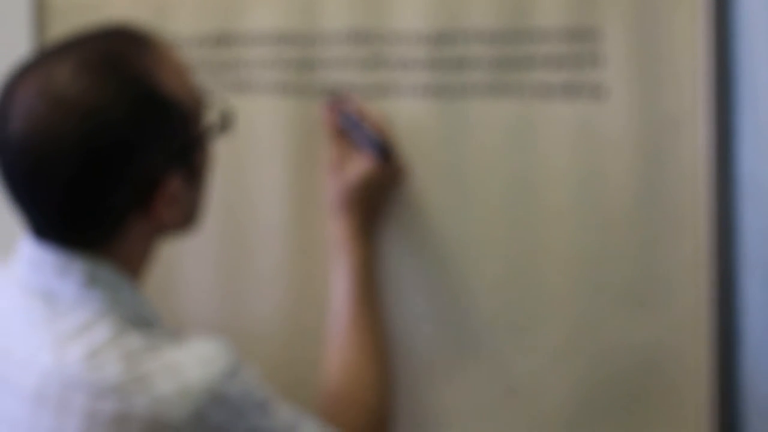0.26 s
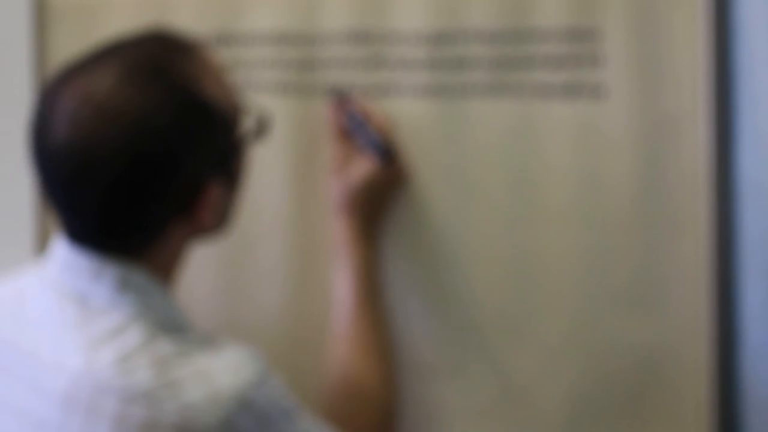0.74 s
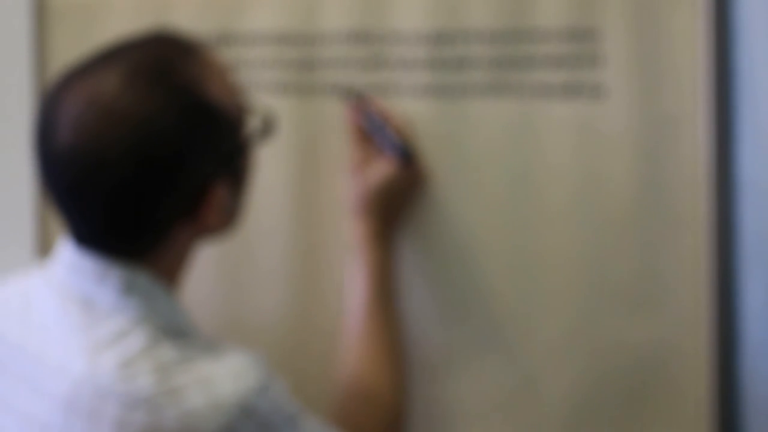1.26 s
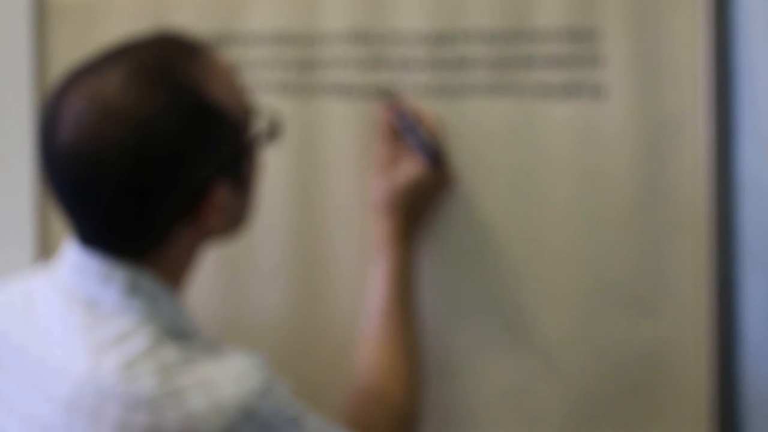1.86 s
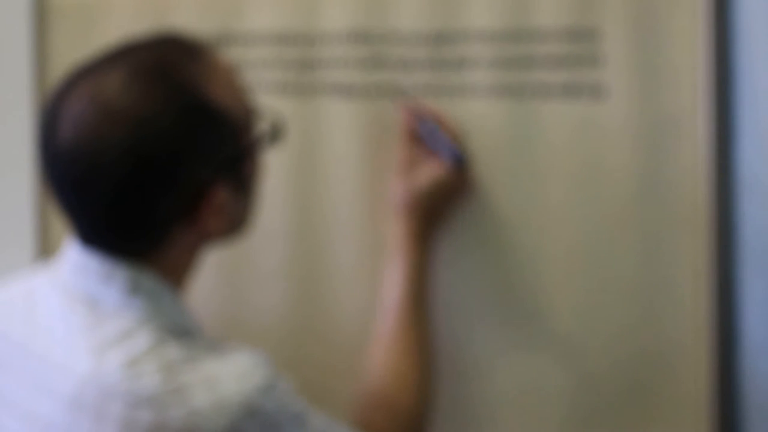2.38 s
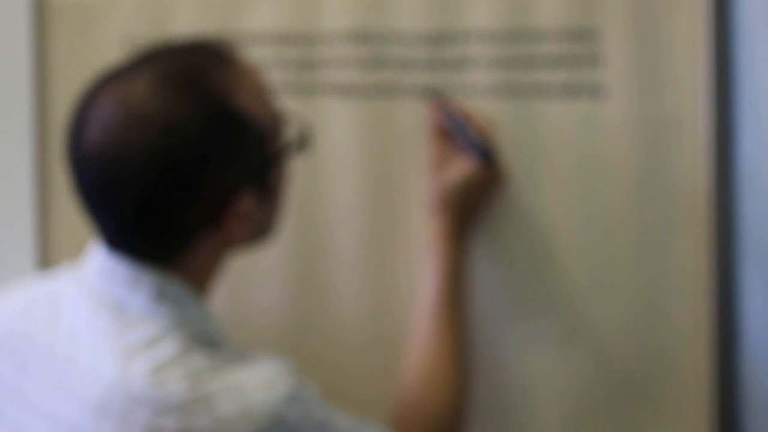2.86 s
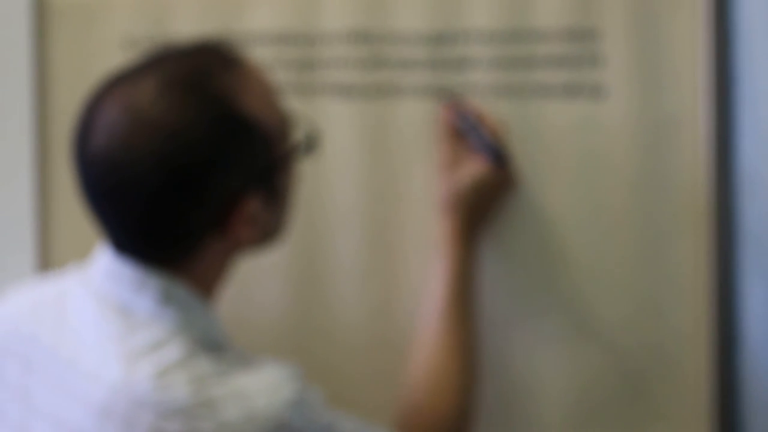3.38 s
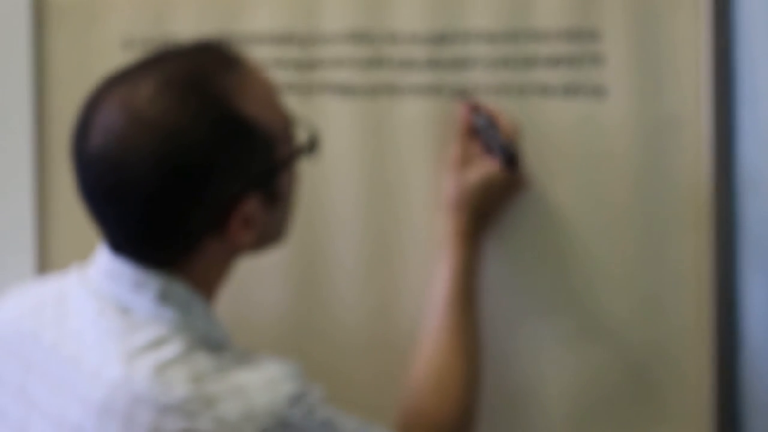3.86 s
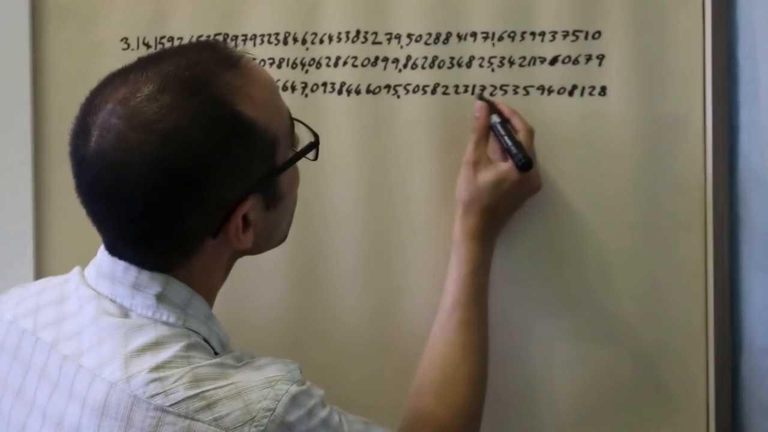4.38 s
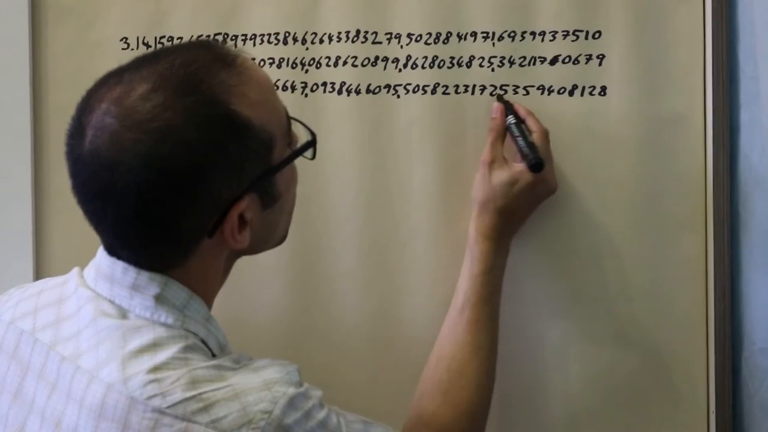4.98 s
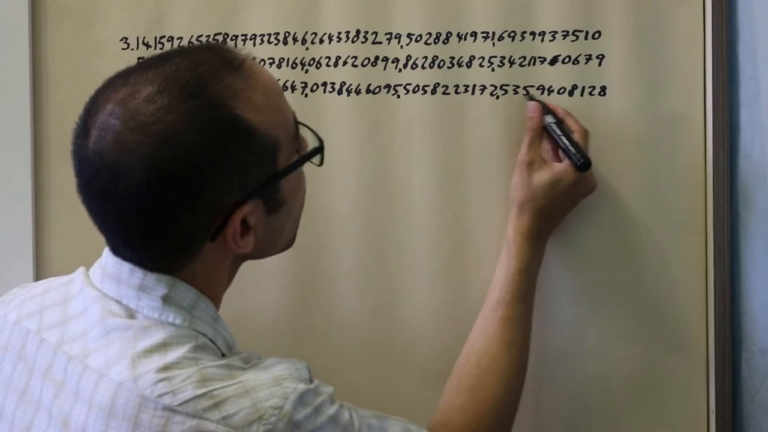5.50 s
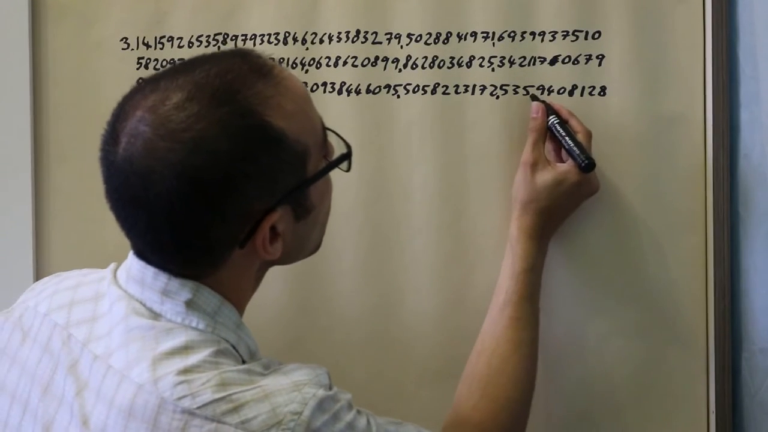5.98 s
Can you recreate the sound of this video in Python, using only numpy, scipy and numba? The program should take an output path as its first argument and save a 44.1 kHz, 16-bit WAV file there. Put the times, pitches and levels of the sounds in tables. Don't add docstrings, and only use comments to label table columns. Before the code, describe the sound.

A quiet indoor room with short, dull reverberation, faint low mains hum and soft steady noise, heard from close to the board. A hand rubs the thin board with a low rumble at the start as a felt-tip marker begins to write. From 0 to 2.4 s, light ticks with hollow low knocks come every quarter to half second, between short, airy, grainy felt hisses. At 2.5 s a much harder tap booms, followed at once by several tiny bounces and a scratch. From 2.8 to 4.4 s the writing is lighter and irregular, with moderate thumps around 3.0 and 3.3 s. A sparse pause follows, with one soft stroke near 4.65 s. At 5.0 s a tap leads to a sharp, loud one at 5.2 s and overlapping hisses; faint brushing follows until a last bright stroke and hard tap at 6.2 s.

```python
import sys
import numpy as np
from scipy import signal
from scipy.fft import rfft, irfft, next_fast_len
from scipy.io import wavfile
from numba import njit

SR = 44100
rng = np.random.default_rng(int(sys.argv[2]) if len(sys.argv) > 2 else 0)


def dump_mix(stems):
    frames = np.atleast_2d(stems).T
    limited = np.clip(frames, -1, 1)
    pcm = np.round(limited * 32767).astype(np.int16)
    wavfile.write(sys.argv[1], SR, pcm)


def undo_db(level):
    steps = np.asarray(level, float) / 20
    return 10 ** steps


N = 275163

# (time [s], tick peak [dB], grip resonance [Hz], boom level [dB], knock level [dB])
LANDINGS = [(0.0246, -36.5, 1570, -30, -29), (0.2433, -33.5, 2750, -23.5, -25),
            (0.5056, -34.5, 2650, -20, -29), (0.7564, -40, 2770, -25, -39),
            (1.2597, -36.5, 1560, -24.5, -28.5), (1.651, -47, 2510, -40, -40.5),
            (1.9097, -36.5, 2830, -26, -37), (2.1387, -34.5, 1570, -28.5, -29),
            (2.3508, -32, 2800, -23, -35), (2.5008, -17.5, 3700, -15, -17.5),
            (2.797, -37.5, 1516, -27.5, -32.5), (3.0467, -33, 2860, -21.5, -27),
            (3.3121, -29, 2080, -22.5, -22.5), (3.5304, -32, 2880, -32, -25),
            (3.9689, -34.5, 2780, -28, -26.5), (4.14, -49, 1570, -31.5, -34),
            (4.359, -37.5, 2730, -39, -32), (5.0361, -28, 2840, -22.5, -25.5),
            (5.2015, -14.5, 1570, -14.5, -19.5), (5.641, -46, 1410, -40, -37.5),
            (5.7941, -41, 2420, -37, -29.5), (6.0305, -41, 2760, -54, -31),
            (6.2015, -15.5, 2830, -16.5, -16.5)]
# (time [s], tick peak [dB], grip resonance [Hz],
# boom level [dB], knock level [dB])
MORE_LANDINGS = [(0.297, -40, 1300, -35, -33.5), (0.94, -40.5, 2110, -59, -59), (1.309, -49, 1920, -28, -43),
                 (1.5286, -59, 1670, -46, -47.5), (1.969, -42.5, 2780, -26, -31.5),
                 (2.4096, -46, 1690, -26.5, -29.5), (2.5274, -25.5, 3220, -20.5, -16.5),
                 (2.5524, -31, 1530, -16.5, -38), (2.5676, -47, 2000, -57, -25), (2.6213, -43, 1520, -26.5, -28),
                 (2.6986, -43, 1744, -33.5, -35), (3.4187, -64, 2250, -30, -56),
                 (3.5857, -33.5, 2920, -26.5, -29.5), (5.0774, -37, 1710, -24, -42),
                 (5.239, -28, 2540, -42, -15.5), (5.2526, -32, 2310, -24, -21), (5.82, -34, 2480, -28, -42),
                 (5.8502, -42, 1500, -35, -29.5), (5.925, -38.5, 1470, -55, -45.5), (5.1, -54, 1500, -37, -28),
                 (6.111, -38, 2600, -51, -47), (0.828, -43, 2800, -44, -51), (3.707, -47.5, 1550, -55, -51),
                 (6.231, -45, 1640, -25, -23)]
CONTACTS = LANDINGS + MORE_LANDINGS


def rms_one(x):
    return x / np.sqrt(np.mean(x ** 2) + 1e-20)


def in_time(rows):
    s, *columns = np.transpose(rows)
    return [np.interp(np.arange(N) / SR, s, c) for c in columns]


def drift(rate):
    r = np.exp(-80 * np.pi * rate / SR)
    noise = rng.standard_normal(N // 40 + 2002)
    slow = signal.lfilter([1], [1, -2 * r, r * r], noise)[2000:]
    return np.interp(np.arange(N) / 40, np.arange(len(slow)), rms_one(slow))


def ring(push, hz, t60):
    r = undo_db(-60 / (t60 * SR))
    w = 2 * np.pi * hz / SR
    return signal.lfilter([0, np.sin(w)], [1, -2 * r * np.cos(w), r * r], push + 1e-18)


def ring_together(push, modes):
    return sum(undo_db(db) * ring(push, hz, t60) for hz, db, t60 in modes)


def soften(x, hz):
    r = np.exp(-2 * np.pi * hz / SR)
    return signal.lfilter([(1 - r) ** 2], [1, -2 * r, r * r], x)


def coloured(source, spectrum, patchy_db):
    hz, db = np.transpose(spectrum)
    edges = np.geomspace(hz[0], 1.1 * hz[-1], int(3 * np.log2(hz[-1] / hz[0])) + 2)
    out = 0
    for k, (low, high) in enumerate(zip(edges, edges[1:])):
        band_pass = signal.butter(2, [low, high], "band", fs=SR, output="sos")
        band = signal.sosfilt(band_pass, source[k % 2])
        level_db = np.interp(np.log(low * high) / 2, np.log(hz), db)
        out = out + band * undo_db(level_db + patchy_db * drift(7.8))
    return rms_one(out)


def swell(rows):
    rise_db, fall_db, roundness = 9, 10.5, 1.42
    edge_s = .011
    t, out = np.arange(N) / SR, np.full(N, 1e-6)
    for s, length, db, place in rows:
        edge = np.clip(np.minimum(t - s, s + length - t) / edge_s + 0.97, 0, 1)
        top = s + np.clip(place, .05, .95) * length
        away = np.interp(t, [s, top, s + length], [1, 0, 1]) ** roundness
        out = np.maximum(out, edge * undo_db(db - away * np.where(t < top, rise_db, fall_db)))
    return out


def background():
    # (frequency [Hz], rms level [dB])
    harmonics = [(49.95, -45), (249.8, -65), (349.7, -61), (649.4, -67.5), (749.3, -73), (849.2, -81),
                 (949.1, -72), (1049, -74.5), (1249, -103), (1449, -79)]
    # (frequency [Hz], level [dB])
    air = [(15, -14), (25, 5.5), (59, -1.5), (96, -10), (169, -2), (290, -29.5), (350, -2.5), (390, -18),
           (538, -40), (650, -23), (806, -28.5), (1340, -28), (4770, -34.5), (9090, -34.5), (15600, -37)]
    t = np.arange(N) / SR
    hum = sum(np.sqrt(2) * undo_db(db) * np.sin(2 * np.pi * (hz * t + rng.random())) for hz, db in harmonics)
    return hum + undo_db(-45.3) * coloured(rng.standard_normal((2, N)), air, patchy_db=.3)


def struck(modes, blow_db, spread_db):
    at = (np.array(CONTACTS)[:, 0] * SR).astype(int)
    chance = rng.standard_normal((len(at), len(modes)))
    out = np.zeros(N)
    for k, (hz, level_db, t60) in enumerate(modes):
        clicks = np.zeros(N)
        clicks[at] = undo_db(blow_db + level_db + spread_db * chance[:, k])
        out += ring(clicks, hz, t60)
    return out


def bending(x, travel_s):
    size = next_fast_len(N + SR)
    hz = np.arange(size // 2 + 1) * SR / size
    delay = np.exp(-4j * np.pi * travel_s * np.sqrt(100 * hz))
    return irfft(rfft(x, size) * delay, size)[:N]


def board():
    # (frequency [Hz], level [dB], t60 [s])
    boom_modes = [(66, -59, 0.22), (101.9, -2.5, 0.21), (136, 4.5, 0.11), (176.8, -4, 0.13)]
    # (frequency [Hz], level [dB], t60 [s])
    knock_modes = [(242, 1, 0.067), (314.5, -6, 0.084), (362.6, -13, 0.15), (442.4, -14.5, 0.064),
                   (529, -6, 0.0081)]
    # (frequency [Hz], level [dB], t60 [s])
    rap_modes = [(640, -19, 0.0083), (900, 14, 0.035), (1030, 10.5, 0.013), (1060, -104, 0.0028)]
    # (frequency [Hz], level [dB], t60 [s])
    sway_modes = [(29.8, 4.6, 0.24), (37.8, 17.6, 0.44), (50.28, 16.5, 0.73)]
    # (frequency [Hz], level [dB], t60 [s])
    rustle_modes = [(358, 2.5, 0.031), (407, 3, 0.03), (482, -0.5, 0.031), (589, -0.5, 0.019),
                    (660, 10, 0.005)]
    # (time [s], rubbing level [dB], leaning level [dB])
    hand = [(0.0, -20, -15), (0.14, -42.5, -27), (0.47, -43, -49), (0.9, -46, -33.5), (1.2, -48.5, -36),
            (1.6, -43, -31), (1.85, -57, -35.5), (2.1, -53, -28.5), (2.52, -39, -19), (2.88, -47, -34.5),
            (3.5, -62, -27.5), (3.95, -47, -40.5), (4.5, -77, -30), (4.97, -75, -44), (5.12, -38, -18.5),
            (5.6, -45.5, -34), (5.9, -38, -25), (6.24, -38.5, -36)]
    # (start [s], length [s], level [dB], place of the hardest point [0-1])
    heel_drags = [
        (0.14, 0.16, -38.5, 0.75),
        (0.62, 0.32, -45, 0.28),
        (2.13, 0.17, -47.5, 0.6),
        (2.88, 0.12, -46.5, 0.8),
        (3.6, 0.14, -44.5, .45),
        (3.92, 0.33, -50.5, 0.2),
        (5.55, 0.2, -48, 0.6),
    ]

    _, tick_db, _, boom_db, knock_db = np.transpose(CONTACTS)
    boom = soften(struck(boom_modes, boom_db, spread_db=2.0), 640)
    knock = soften(struck(knock_modes, knock_db + 1, spread_db=4.0), 1230)
    rap_db = -51.5 + 1.46 * (tick_db + 22.5)
    rap = struck(rap_modes, rap_db, spread_db=2.0)
    sway = soften(struck(sway_modes, boom_db - 24.5, spread_db=2.0), 63)
    blows = bending(boom + knock - rap + sway, travel_s=0.00816)

    rub_db, lean_db = in_time(hand)
    rub = rng.standard_normal((3, N)) * undo_db(2.6 * drift(23))
    rumble = undo_db(rub_db - 4.0) * rms_one(ring_together(rub[0], boom_modes))
    rustle_db = np.maximum(-56 + 0.22 * (rub_db + 59), 20 * np.log10(swell(heel_drags)))
    rustle = undo_db(rustle_db) * rms_one(ring_together(rub[1], rustle_modes))
    lean = undo_db(lean_db - 8) * rms_one(ring_together(rub[2], sway_modes))
    return blows + rumble + rustle + lean


@njit
def moving_peak(x, hz, r, sr):
    y = np.zeros(len(x))
    for i in range(2, len(x)):
        y[i] = x[i] - x[i - 2] + 2 * r * np.cos(2 * np.pi * hz[i] / sr) * y[i - 1] - r * r * y[i - 2]
    return y


def felt():
    # (start [s], length [s], peak hiss [dB], place of the fastest point [0-1])
    strokes = [(0.25, .07, -43.5, 0.23), (0.44, 0.087, -43.5, 0.7), (0.87, 0.026, -45, 0.35),
               (1.1, 0.16, -39.5, 0.66), (1.385, 0.1, -43.5, 0.73), (1.595, 0.064, -39.5, 0.65),
               (1.645, 0.12, -40, 0.43), (1.905, 0.17, -47, 0.1), (2.0, 0.12, -43, 0.33),
               (2.06, .12, -40.5, 0.5), (2.34, 0.042, -37, 1), (2.39, 0.22, -36.5, 0.52),
               (2.61, 0.16, -42, 0.7), (2.79, 0.082, -41, .45), (3.23, 0.11, -36.5, 0.69),
               (3.38, 0.032, -48, 0.3), (3.53, 0.098, -42, 0.74), (3.975, 0.17, -40.5, 0.38),
               (4.07, 0.077, -40.5, .6), (4.415, 0.058, -46, 0.3), (4.64, 0.12, -37.5, 0.68),
               (4.795, 0.027, -46, 0.54), (5.025, 0.064, -39.5, 0.76), (5.1, 0.42, -41, 0.37),
               (5.27, 0.21, -40, 0.4), (5.51, 0.091, -39, 0.5), (6.075, 0.031, -41.5, 0.96),
               (6.12, 0.1, -34, 0.69), (0.292, 0.011, -39, .45)]
    # (start [s], length [s], skin hiss [dB], place of the fastest point [0-1])
    slides = [
        (-0.03, 0.76, -51, 0.18),
        (0.3, 0.41, -49.5, 0.47),
        (0.75, 0.34, -54.5, 0.2),
        (2.2, 0.65, -51, 0.5),
        (2.85, 0.36, -61, .6),
        (3.8, 0.46, -58.5, .45),
        (5.1, 0.14, -96.5, .35),
        (5.55, 0.62, -50, 0.57),
        (6.15, .12, -51, .75),
    ]
    # (start [s], length [s], scrape [dB], place of the hardest point [0-1])
    skids = [
        (0.12, 0.28, -57.5, 0.55),
        (0.44, 0.22, -57, 0.14),
        (1.38, 0.11, -57, .2),
        (2.342, 0.05, -47.5, 0.6),
        (2.66, 0.17, -56, 0.26),
        (5.04, 0.039, -50, 0.5),
        (5.38, 0.1, -63, 0.4),
        (5.7, 0.42, -59, 0.09),
        (5.175, 0.036, -51, 0.8),
        (6.16, 0.06, -49, 0.8),
    ]
    # (frequency [Hz], level per Hz [dB])
    hiss_spectrum = [(2350, -26), (4000, -20.5), (4310, 38), (5050, -3), (6830, 2), (9610, 10),
                     (10900, -3.5), (11900, 0.5), (15600, -3.5)]
    # (frequency [Hz], level per Hz [dB])
    scrape_spectrum = [(410, -11), (700, 14), (1050, 5), (1140, 6), (2380, 10), (4000, 1), (4320, 3),
                       (5500, -34), (7150, -23), (12100, -120)]
    # (frequency [Hz], level [dB], t60 [s])
    drag_modes = [(1720, 1.5, 0.013), (2950, 3, 0.007), (4360, -3, 0.01)]

    tip, skid = swell(strokes), swell(skids)
    hiss = np.maximum(tip, swell(slides))
    scrape = np.maximum(undo_db(-56) * (100 * tip) ** 0.58, skid)

    crest_hz = 8900 + 68 * 20 * np.log10(100 * hiss) + 250 * drift(1)
    crest_hz = np.clip(crest_hz, 6000, 13000)
    slips = rng.standard_normal((4, N)) * undo_db(3.0 * np.minimum(rng.exponential(1, (4, N)), 4))
    crest = rms_one(moving_peak(slips[0], crest_hz, np.exp(-np.pi * 1500 / SR), SR))
    bright = rms_one(coloured(slips[:2], hiss_spectrum, patchy_db=2.3) + 0.43 * crest)

    drag = rms_one(ring_together(slips[2], drag_modes))
    dull = rms_one(coloured(slips[2:], scrape_spectrum, patchy_db=2.2) + .6 * drag)
    pressure = undo_db(1.3 * drift(40))
    return pressure * (undo_db(-1.85) * hiss * bright + undo_db(2.5) * scrape * dull + undo_db(-1.5) * skid * drag)


def ticks():
    # (frequency [Hz], level [dB], t60 [s])
    barrel = [(1504, -5, 0.006), (2320, 7, 0.0015), (2780, -24.5, 0.0069), (3450, -52, 0.0061),
              (4700, -69, 0.0015)]
    out, t = np.zeros(N), np.arange(1300) / SR
    crunch_shape = t / 0.0033 * np.exp(1 - t / 0.0009) + 0.28 * np.exp(-t / .004)
    crunch = rng.standard_normal((len(CONTACTS), len(t))) * crunch_shape
    soft_tip = signal.butter(4, 4300, fs=SR, output="sos")
    for (s, db, hz, *_), push in zip(CONTACTS, crunch):
        body = ring(push, hz, .004) + ring_together(push, barrel)
        radiated = signal.lfilter([1, -1], [1, -.85], body)
        tick = signal.sosfilt(soft_tip, radiated)
        i = int(s * SR)
        out[i:i + len(t)] += (undo_db(db + 0.5) * tick / np.abs(tick).max())[:N - i]
    return out


def room(x):
    t60_s, wall_cut_hz = 0.2, 2800
    t = np.arange(SR // 2) / SR
    onset = np.clip(t / 0.0081 - .6, 0, 1)
    tail = soften(rng.standard_normal(len(t)), wall_cut_hz) * undo_db(-60 * t / t60_s) * onset
    return signal.fftconvolve(x, tail / np.sqrt(np.sum(tail ** 2)))[:N]


def scene():
    near = board() + felt() + ticks()
    return (near + undo_db(-16) * room(near) + background())[None]


def band_limit(x):
    return signal.sosfilt(signal.butter(12, 15730, fs=SR, output="sos"), x)


def record(dry):
    rounded = 1.41 * np.tanh(dry / 1.06)
    low_pass = signal.cheby2(14, 50, 15900, fs=SR, output="sos")
    mix = signal.sosfilt(low_pass, rounded)
    return band_limit(mix)


dry = scene()
out = record(dry)
dump_mix(out)
```